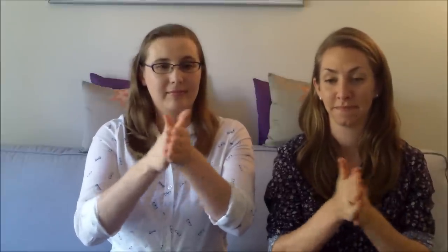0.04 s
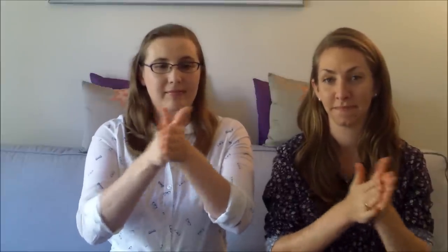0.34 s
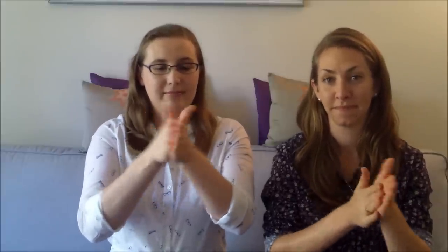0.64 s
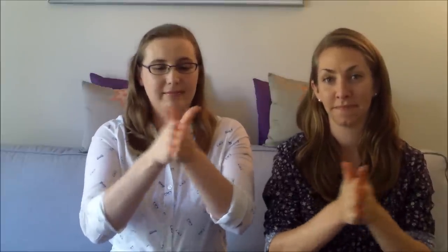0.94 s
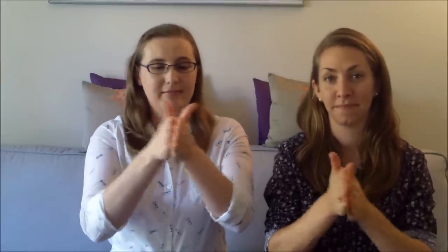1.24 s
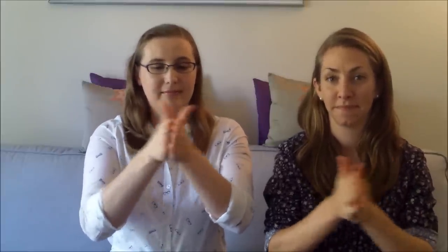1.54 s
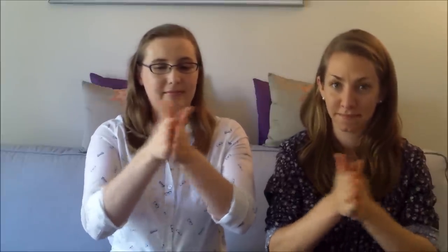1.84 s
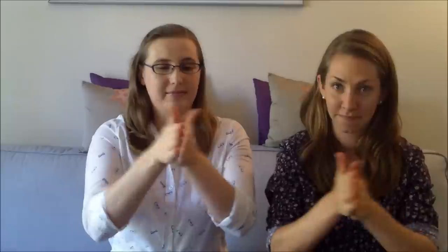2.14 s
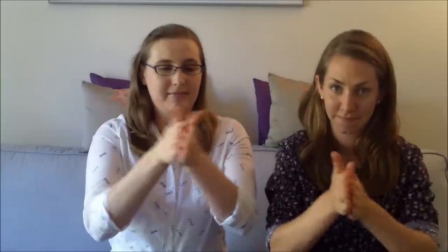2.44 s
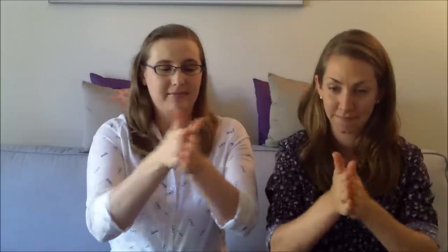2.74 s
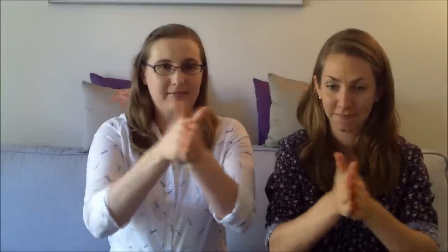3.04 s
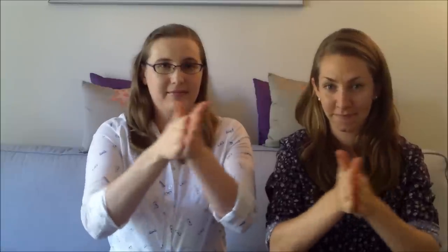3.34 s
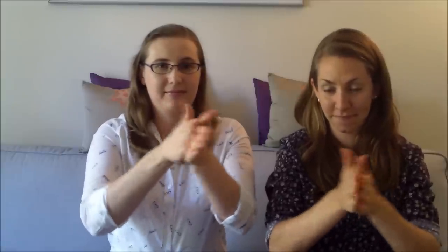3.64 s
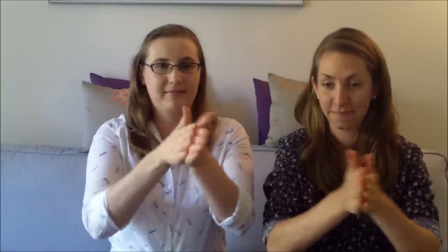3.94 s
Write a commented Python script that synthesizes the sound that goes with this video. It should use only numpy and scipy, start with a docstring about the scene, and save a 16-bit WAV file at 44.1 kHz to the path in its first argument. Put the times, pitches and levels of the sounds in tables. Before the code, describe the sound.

Hands rub briskly and without pause, two pairs making an overlapping rhythmic hiss of skin, dotted with light cupped pats and a few dull bumps. It is heard from close by in a small, quiet room.

```python
"""The dry hiss of palms rubbing: two people on a sofa, each at about seven strokes a second,
drifting in and out of step. One pair of hands is flat; the other is cupped and closes on a
pocket of air at each stroke, with a soft hollow pat. Heard from one fixed microphone position
in a small room, near enough for the direct sound to lead, over low rumble and faint room noise."""
import sys
import numpy as np
from scipy import signal
from scipy.fft import rfft, irfft
from scipy.io import wavfile

SR = 44100
rng = np.random.default_rng(int(sys.argv[2]) if len(sys.argv) > 2 else 0)


def generate_wav(sig):
    """Save sig (samples, or channels by samples) to the path in sys.argv[1] as 16-bit PCM at SR."""
    pcm = np.round(np.clip(np.atleast_2d(sig).T, -1, 1) * 32767).astype(np.int16)
    wavfile.write(sys.argv[1], SR, pcm)


N = 176400
T = np.arange(N) / SR

# strokes of the flat hands: middle t/s, length/s, level/dB
FLAT_STROKES = [(-0.002, 0.09, -54), (0.16, 0.113, -61), (0.265, 0.13, -55.5), (0.358, 0.2, -54),
                (0.522, 0.14, -55.5), (0.631, 0.09, -55.5), (0.746, 0.17, -53.0), (0.924, 0.149, -53),
                (1.136, 0.133, -53.5), (1.247, 0.089, -56), (1.329, 0.2, -54.5), (1.533, 0.13, -50.5),
                (1.683, 0.2, -52), (1.843, 0.17, -48), (1.973, 0.18, -50), (2.136, 0.16, -49.5),
                (2.27, 0.17, -49.0), (2.38, 0.046, -51.5), (2.557, 0.17, -49), (2.715, 0.21, -49.5),
                (2.836, 0.15, -50.5), (3.007, 0.28, -52), (3.116, 0.11, -50), (3.292, 0.24, -48.5),
                (3.414, 0.14, -48.5), (3.543, 0.1, -50.5), (3.677, 0.16, -49.5), (3.832, 0.096, -49.5),
                (3.972, 0.175, -51.5)]
# strokes of the cupped hands: t/s, pat level/dB, pocket f/Hz, swish level/dB, squeezed-air level/dB
CUPPED_STROKES = [(0.11, -56, 2250, -44, -52.0), (0.264, -62, 2280, -47, -53),
                  (0.4361, -45, 2110, -45.5, -48.0), (0.5745, -50.5, 2150, -42, -46.5),
                  (0.7386, -40.0, 2070, -47.0, -49.5), (0.869, -49.5, 2220, -45.5, -46.5),
                  (1.046, -50, 2060, -42.5, -51.5), (1.183, -63, 2170, -42.5, -50.5),
                  (1.3506, -51.5, 2170, -43.5, -46.5), (1.496, -58, 2130, -44.5, -50.5),
                  (1.6646, -61.5, 1800, -40, -49), (1.806, -50, 2220, -47, -49.5),
                  (1.9835, -66, 2010, -42, -49.5), (2.105, -56, 2350, -44, -47.5),
                  (2.2708, -47, 1840, -41, -51), (2.399, -50.5, 2020, -38.5, -50),
                  (2.5644, -54, 2000, -45, -49.0), (2.686, -53, 1970, -40.5, -47.5),
                  (2.8705, -38, 1930, -40.0, -53), (2.9932, -49.5, 1820, -39, -45.0),
                  (3.1515, -49, 2070, -38.5, -44.5), (3.2728, -50, 2250, -42.0, -46.5),
                  (3.4508, -46.5, 1820, -39.5, -47.5), (3.5751, -41, 2050, -39, -46),
                  (3.738, -43, 2180, -38, -44.5), (3.8714, -48, 2170, -41.0, -54)]
SLAP_DB, SWISH_DB, SQUEEZE_DB = -3.5, -9.5, -6.5  # added to the pat, swish and squeezed-air levels
# short pitched sounds just after a pat, second pops and brief high skin squeaks: t/s, level/dB, f/Hz
POPS_AND_SQUEAKS = [(.449,-60,2240),(1.053,-49,2220),(1.847,-49,2880),(2.882,-41,2060),(3.590,-39,2260),(3.600,-47,2020),(3.603,-49,2960)]
# the skin sticks briefly: t/s, level/dB
SKIN_CATCHES = [(0.421, -51), (0.738, -47.5), (0.874, -48.5), (1.041, -49), (2.4, -46), (2.688, -45.5),
                (2.813, -48), (2.87, -51), (3.748, -44)]
# soft knocks of the hands: t/s, level/dB
HEEL_BUMPS = [(0.739,-48.5),(2.872,-63),(2.992,-48.5)]
# spectra of sliding skin, slap and bump: f/Hz, relative level/dB
SKIN_SPECTRUM = [(200,-12),(500,-8),(900,-15),(1400,-11),(2200,-10.5),(3000,-10.5),(3900,-11),(5200,-7),(6400,-5.5),(7800,-7.5),(8700,-2),(9500,2.5),(10400,-2.5),(11300,-9.5),(12600,-15.5),(15500,-21)]
SLAP_SPECTRUM = [(300,-23),(550,-4),(1150,5),(1500,-6),(2200,-8),(3500,-5.5),(6000,-14),(9500,-5),(15000,-29)]
BUMP_SPECTRUM = [(50,-10),(150,-2),(450,5),(1100,-9),(2500,-28),(8000,-58)]
# echoes from surfaces near the microphone: delay t/s, gain relative to one another
NEAR_ECHOES = [(.0071,.16),(.0096,-0.22),(.0122,0.29),(0.0147,.18)]
# reverberation of the room: f/Hz, time to fall 60 dB t/s
ROOM_DECAY = [(150,0.24),(1000,0.47),(2500,0.57),(9000,0.34)]
# spectra of the room's rumble and hiss: f/Hz, relative level/dB
RUMBLE_SPECTRUM = [(8, -26), (18, 0.5), (38, 0.5), (50, -11), (100, -16), (200, -26), (500, -82),
                   (2000, -79)]
HISS_SPECTRUM = [(30, 12), (150, 3.5), (340, 6), (500, 0), (800, -1.5), (3000, -6), (6000, -6.5),
                 (9500, -9), (15500, -10)]
# thin hum in the room: f/Hz, level/dB
HUM_TONES = [(281,-82),(534,-77.5),(1222,-80.5)]

CONTACT_RISE_S = 0.00048  # attack of pops, squeaks, slaps and bumps


def flat_hands():
    """Each stroke speeds up and slows down; the hiss follows the speed."""
    power = np.full(N, amp(-60.5) ** 2)  # the palms never quite stop
    for middle, length, db in FLAT_STROKES:
        speed = np.maximum(np.cos(np.pi * np.clip((T - middle) / length, -0.5, 0.5)), 0)
        power += (amp(db) * speed ** 1.57) ** 2
    return friction(np.sqrt(power), db_per_octave=1.1)


def cupped_hands():
    """The hiss of sliding skin swells towards each pat and fades after it."""
    lead_s, rise_s, fall_s = 0.0069, 0.018, 0.049
    power = np.zeros(N)
    for start, _, _, db, _ in CUPPED_STROKES:
        t = T - start - lead_s  # the pat leads the peak of the swish
        width = np.where(t < 0, rise_s, fall_s)
        power += amp(db + SWISH_DB) ** 2 / (1 + (t / width) ** 2) ** 2
    return friction(np.sqrt(power))


def catches():
    """Short harder rasps where the skin sticks and lets go."""
    return friction(sum(amp(db) * burst(start, rise_s=0.008, decay_s=0.0045)
                        for start, db in SKIN_CATCHES))


def friction(envelope, db_per_octave=0):
    """Skin ridges catch and slip in dense tiny grains under an uneven pressure."""
    grains_per_s, body_edge_hz = 16000, 5400
    grains = rng.standard_normal(N) * amp(-0.2 * np.minimum(rng.exponential(1, N), 4))
    grains *= rng.random(N) < grains_per_s / SR
    hiss = colour(grains, SKIN_SPECTRUM, db_per_octave)
    body = signal.sosfiltfilt(signal.butter(2, body_edge_hz, fs=SR, output="sos"), hiss)
    treble = hiss - body
    wander = amp(1.4 * drift(seconds=0.032))  # the colour shifts as other parts of the skin touch
    judder = amp(0.5 * drift(seconds=0.0082))
    return (treble + body * wander) * envelope * judder


def pats():
    """The palms meet with a light slap, pop the pocket between them and squeeze its air out."""
    pitched = sum(ring(*row) for row in POPS_AND_SQUEAKS)
    slap = np.zeros(N)
    for start, db, hz, _, air_db in CUPPED_STROKES:
        squeeze = burst(start, rise_s=0.0045, decay_s=0.022)
        pitched += ring(start, db, hz)
        pitched += amp(air_db + SQUEEZE_DB) * puff(squeeze, hz, width_hz=630)
        slap += amp(db + SLAP_DB) * burst(start, CONTACT_RISE_S, decay_s=0.0029)
    return pitched + slap * noise(SLAP_SPECTRUM)


def ring(start, db, hz):
    """A pocket pop or skin squeak: a few cycles of tone with a weaker upper mode."""
    glide_depth, glide_s = 0.23, 0.001  # starts low and rises, as a pop does when the pocket seals
    t = np.maximum(T - start, 0)
    phase = 2 * np.pi * hz * (t - glide_depth * glide_s * (1 - np.exp(-t / glide_s)))
    modes = np.sin(phase) + amp(-8.5) * np.sin(1.2 * phase)
    return amp(db) * burst(start, CONTACT_RISE_S, decay_s=0.0026) * np.sqrt(2) * modes


def puff(envelope, hz, width_hz):
    """Air rushes through the resonant pocket between the palms, as strong as its envelope."""
    air = rng.standard_normal(N) * envelope
    for bandwidth in (width_hz, 2 * width_hz):
        air = signal.lfilter(*signal.iirpeak(hz, hz / bandwidth, fs=SR), air)
    return unit(air) * np.sqrt(np.mean(envelope ** 2))


def bumps():
    """The heels of the hands knock together dully."""
    knocks = sum(amp(db) * burst(start, CONTACT_RISE_S, decay_s=0.006) for start, db in HEEL_BUMPS)
    return knocks * noise(BUMP_SPECTRUM)


def room(direct, tail_db, echo_db):
    """At the microphone: direct sound, near echoes and a short, smooth room tail."""
    near = sum(gain * np.interp(T - delay, T, direct, left=0) for delay, gain in NEAR_ECHOES)
    build_s, crossfade_hz = 0.008, 0.8
    far = np.zeros(N)
    for k in range(4):  # four noise tails crossfade at a steady rate
        hz, t, spectrum = signal.stft(rng.standard_normal(SR // 2), SR, nperseg=256)
        decay = amp(-60 * t / read(ROOM_DECAY, hz)[:, None])
        tail = signal.istft(spectrum * decay * np.minimum(t / build_s, 1), SR, nperseg=256)[1]
        share = np.maximum(np.cos(2 * np.pi * (crossfade_hz * T - k / 4)), 0)
        far += signal.fftconvolve(direct * share, tail / np.linalg.norm(tail))[:N]
    return direct + amp(echo_db) * near + amp(tail_db) * far


def room_tone():
    """Behind the hands: a thin wavering hum, low rumble and faint hiss."""
    hum = np.zeros(N)
    for hz, db in HUM_TONES:
        wavering_hz = hz + 2.466 * drift(seconds=0.059)
        hum += amp(db) * np.sqrt(2) * np.sin(2 * np.pi * np.cumsum(wavering_hz) / SR)
    return hum + amp(-53.5) * noise(RUMBLE_SPECTRUM) + amp(-59) * noise(HISS_SPECTRUM)


def amp(db):
    """Decibels to gain."""
    return 10 ** (np.asarray(db) / 20)


def unit(x):
    """Scales to rms 1."""
    return x / np.sqrt(np.mean(x ** 2) + 1e-20)


def read(points, hz):
    """Reads a table on a log-frequency axis."""
    f, value = np.transpose(points)
    return np.interp(np.log(hz + 1), np.log(f + 1), value)


def colour(x, spectrum, db_per_octave=0):
    """Gives a steady signal a spectrum, at rms 1."""
    hz = np.fft.rfftfreq(N, 1 / SR)
    gain = amp(read(spectrum, hz) + db_per_octave * np.log2(hz + 1))
    return unit(irfft(rfft(x) * gain, N))


def noise(spectrum):
    """Steady coloured noise, at rms 1."""
    return colour(rng.standard_normal(N), spectrum)


def drift(seconds):
    """A smooth random curve that changes over the given time, at rms 1."""
    hz = np.fft.rfftfreq(N, 1 / SR)
    smoothing = np.exp(-(2 * hz * seconds) ** 2)
    return unit(irfft(rfft(rng.standard_normal(N)) * smoothing, N))


def burst(start, rise_s, decay_s):
    """Linear rise and exponential fall."""
    t = np.maximum(T - start, 0)
    fall = np.exp(-np.clip((t - rise_s) / decay_s, 0, 100))
    return np.minimum(t / rise_s, 1) * fall


def scene():
    """Both pairs of hands in the room, in mono on two channels."""
    rubbing = room(flat_hands() + cupped_hands() + catches(), tail_db=-15, echo_db=-7.5)
    patting = room(pats() + bumps(), tail_db=-6, echo_db=-5)
    mono = rubbing + patting + room_tone()
    return np.array([mono, mono])


def record(dry):
    """The recorder cuts off the highest treble."""
    edge_hz = 15760
    lowpass = signal.firwin(801, edge_hz, window=("kaiser", 9), fs=SR)
    return signal.oaconvolve(dry, lowpass[None], "same")


dry = scene()
out = record(dry)
generate_wav(out)
```